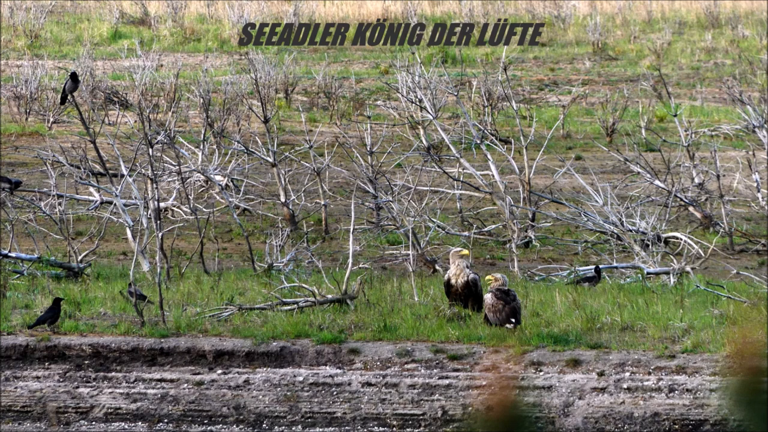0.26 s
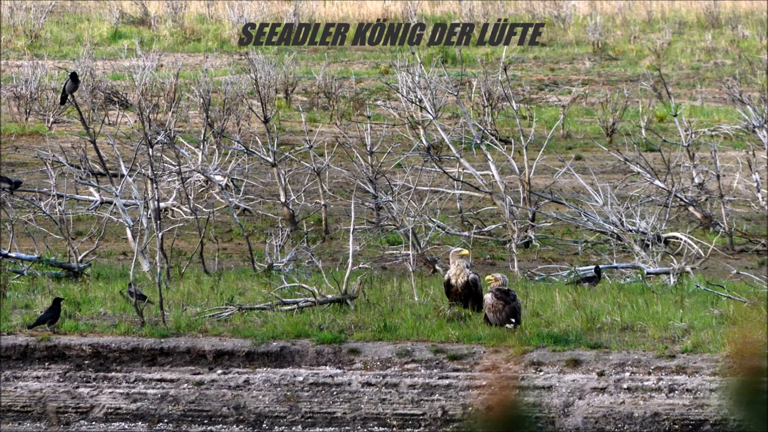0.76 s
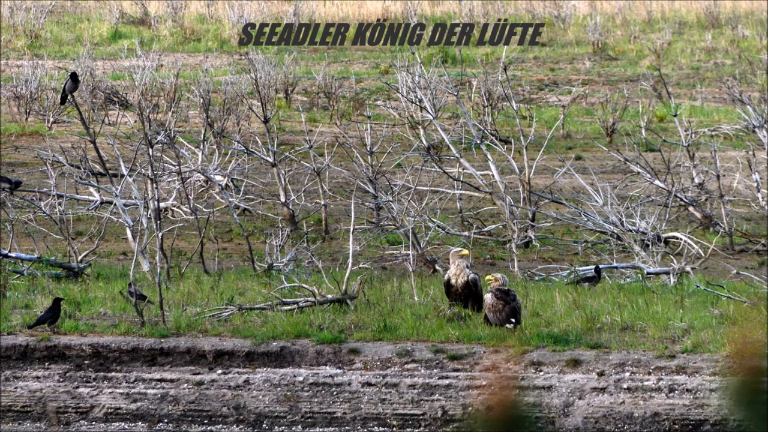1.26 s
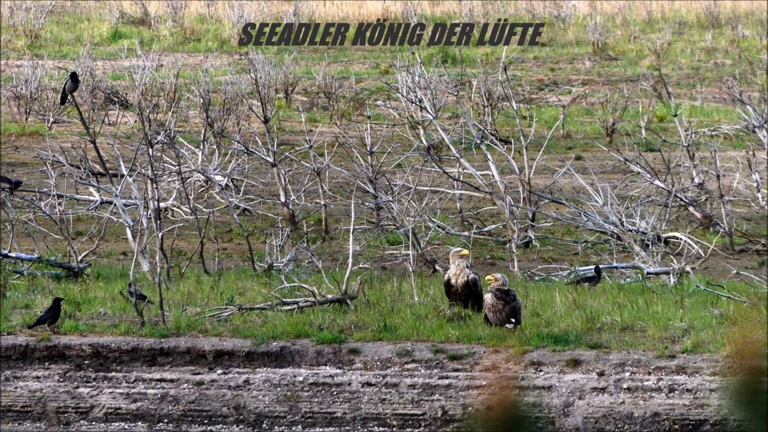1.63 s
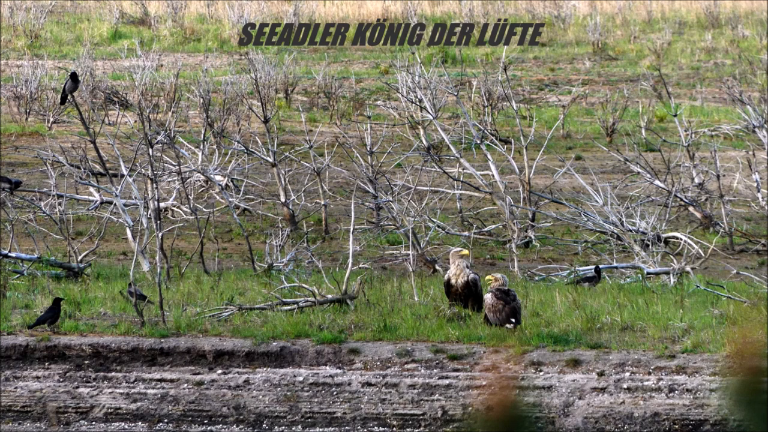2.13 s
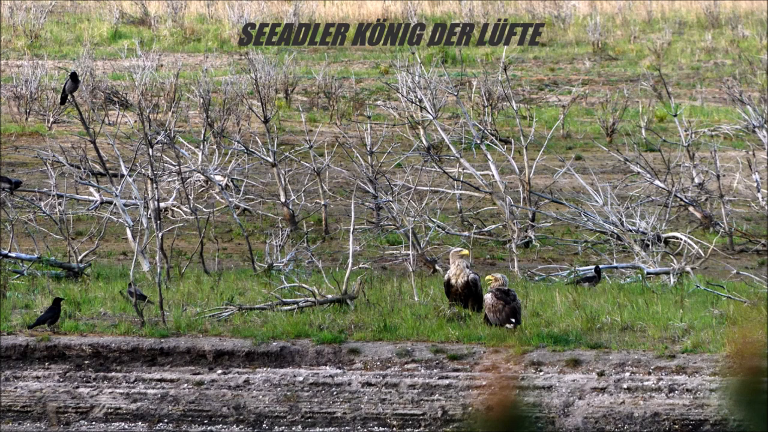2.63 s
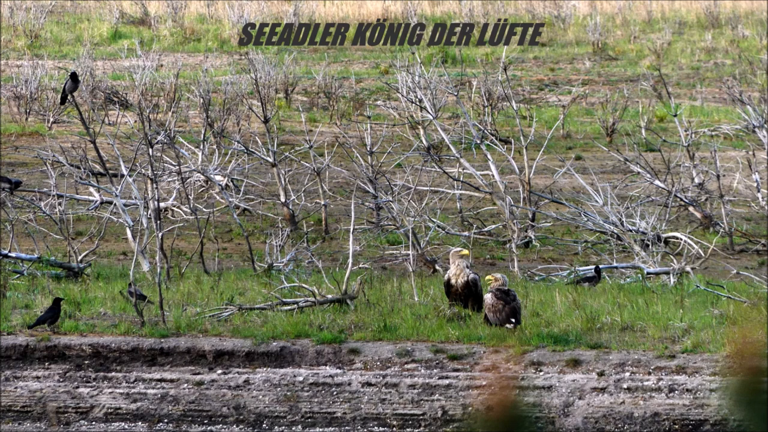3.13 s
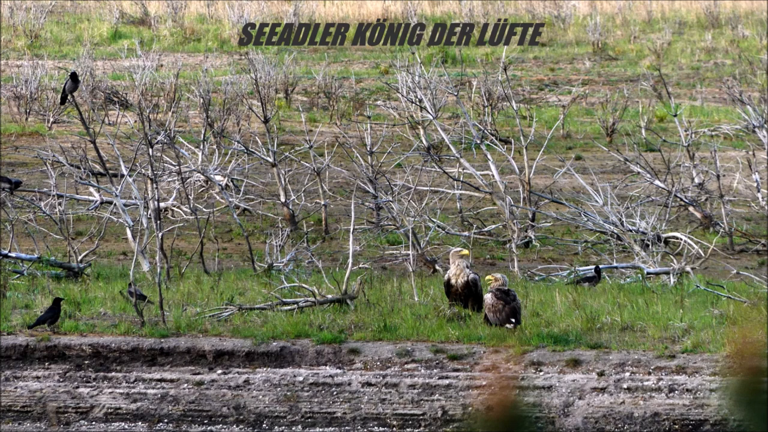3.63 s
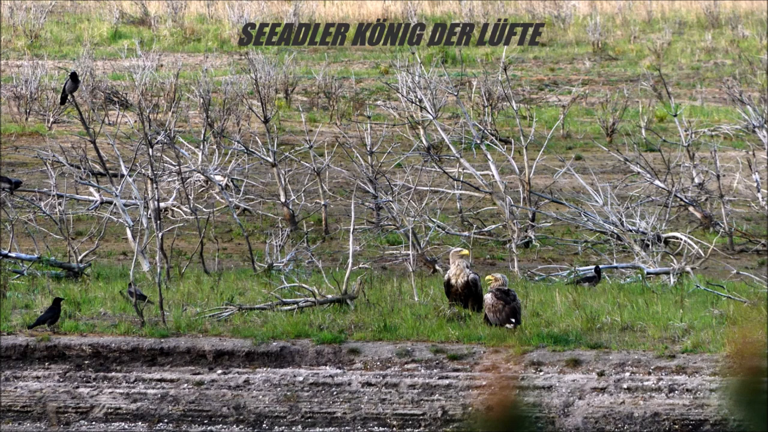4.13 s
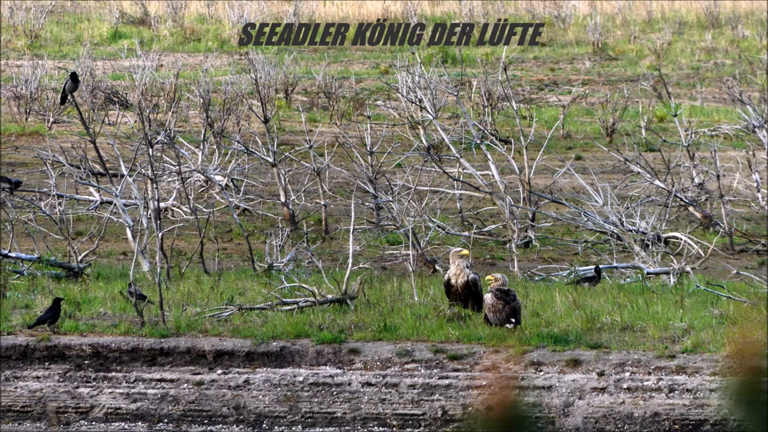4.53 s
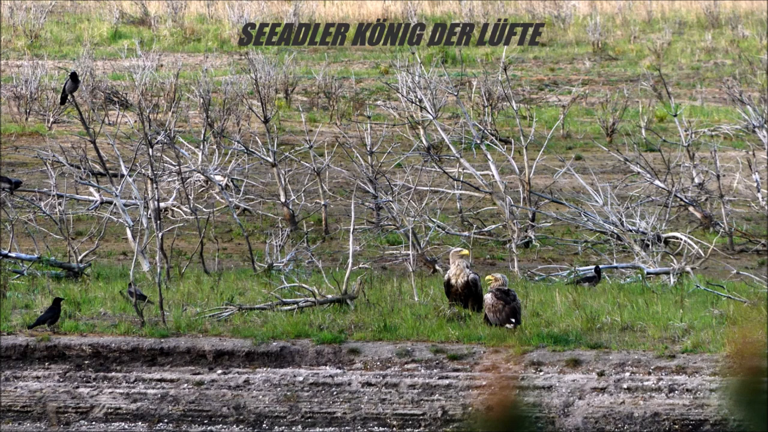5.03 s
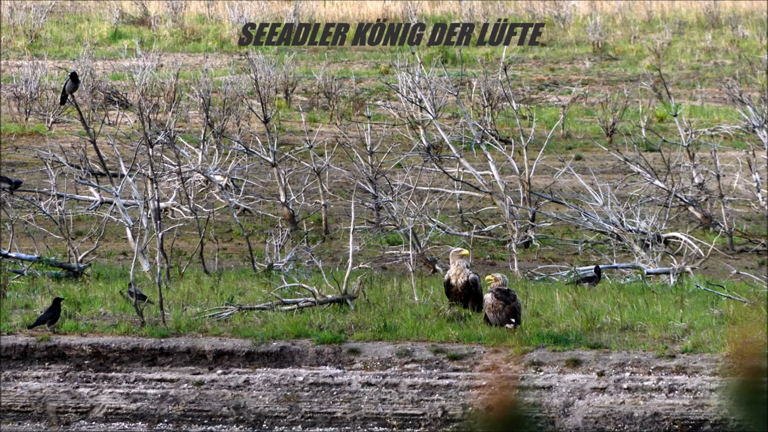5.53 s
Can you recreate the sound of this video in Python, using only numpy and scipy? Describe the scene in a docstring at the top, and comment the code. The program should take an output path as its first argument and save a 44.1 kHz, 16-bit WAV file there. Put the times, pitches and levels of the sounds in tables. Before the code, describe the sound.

Two large eagles call outdoors among dead trees, at a distance from the microphone. One gives loud, hoarse, breaking yelps that thin into short spaced ones; from about three seconds another repeats rounded yelps around five per second, slowly fading. Each leaves a wavering echo. Faint wind hiss and small high bird-like chirps lie beneath. Near the end a click chops the sound and a fresh yelp follows.

```python
"""Eagles over a marsh

Two large eagles yelp in bouts across a marsh of dead trees, far from a microphone.
Each note is a short stack of gliding overtones; trunks and banks scatter it back as a wavering noise tail.
Narrow noise makes faint high patches, an insect line and a murmur; noise bands make a faint wind.
Near the end a splice chops the sound with a click and fades the next piece in."""
import sys
import numpy as np
from scipy import signal
from scipy.fft import rfft, irfft, next_fast_len
from scipy.io import wavfile
from scipy.ndimage import uniform_filter1d

SR = 44100
rng = np.random.default_rng(int(sys.argv[2]) if len(sys.argv) > 2 else 0)


def waveform_to_disk(signal):
    """Save audio, clipped to [-1, 1], as 16-bit WAV at the path in sys.argv[1]."""
    frames = np.transpose(np.atleast_2d(signal))
    scaled = np.clip(frames, -1, 1) * 32767
    samples = np.round(scaled).astype(np.int16)
    wavfile.write(sys.argv[1], SR, samples)


N = 254456
TIME_S = np.arange(N) / SR
SPLICE_S, SPLICE_FADE_S = 5.6488, 0.004


def undb(db):
    """dB to gain."""
    return 10 ** (np.asarray(db) / 20)


def walk(steps_per_s, size):
    """Smooth random walk with spread near 1."""
    hold = max(int(SR / steps_per_s), 1)
    steps = np.repeat(rng.standard_normal(size // hold + 1), hold)
    return 1.42 * uniform_filter1d(uniform_filter1d(steps, hold), hold)[:size]


def curve(rows):
    """Rows (time_s, value) as one value a sample."""
    return np.interp(TIME_S, *np.transpose(rows))


def add(out, start_s, sound):
    """Mix a sound in at start_s."""
    i = int(start_s * SR)
    out[i:i + len(sound)] += sound[:len(out) - i]


def smear(hz, width_hz):
    """Narrow noise around a moving centre: random walks on a sine and a cosine."""
    phase = 2 * np.pi * np.cumsum(hz) / SR
    return walk(width_hz, len(hz)) * np.sin(phase) + walk(width_hz, len(hz)) * np.cos(phase)


def bursts(rows, throb_db, taper):
    """Patches of throbbing noise around a gliding centre."""
    out = np.zeros(N)
    for start_s, length_s, start_hz, end_hz, width_hz, level_db in rows:
        size = int(length_s * SR)
        patch = smear(np.linspace(start_hz, end_hz, size), width_hz)
        patch *= undb(level_db + throb_db * walk(33, size))
        add(out, start_s, patch * signal.windows.tukey(size, taper))
    return out


# echo of calls made before the start: centre_hz, width_hz, level_db
EARLIER_ECHO = [(2727, 460, -55.5), (1900, 490, -55.5), (1220, 350, -76.5), (4060, 3100, -69)]
EARLIER_T60_S = 0.99


def earlier_calls():
    """Narrow noise that still rings at the start and decays exponentially."""
    ring = sum(smear(np.full(SR, hz), width_hz) * undb(level_db) for hz, width_hz, level_db in EARLIER_ECHO)
    decay_db = -60 * np.arange(SR) / SR / EARLIER_T60_S
    return np.pad(ring * undb(decay_db), (0, N - SR))


# faint high patches, some perhaps small birds, the wide one a hissy wash:
# start_s, length_s, start_hz, end_hz, width_hz, level_db
HIGH_PATCHES = [(0.0, 0.255, 5430, 5350, 693, -61), (0.01, 0.62, 5460, 5640, 2500, -69.5),
                (0.246, 0.48, 6700, 6740, 720, -71), (.27, 0.07, 6800, 6870, 496, -61.5),
                (.4, 0.11, 6880, 6810, 117, -54.5), (.47, 0.28, 5200, 5250, 510, -59.5),
                (.62, 0.17, 4200, 4230, 397, -66.5), (.66, 0.24, 3180, 3210, 160, -58),
                (.85, 0.26, 3120, 3220, 155, -79), (2.55, 0.2, 5350, 5220, 302, -74.5),
                (5.35, 0.12, 5440, 5040, 300, -76), (5.7, 0.066, 5500, 5600, 200.5, -83)]


def faint_patches():
    """Faint patches of high throbbing noise, some perhaps small birds; the wide one a hissy wash."""
    return bursts(HIGH_PATCHES, throb_db=2.0, taper=0.33)


INSECT_HZ, INSECT_DB = 6010, -92


def insects():
    """A thin whine at one pitch, wavering in level."""
    return smear(np.full(N, INSECT_HZ), 40) * undb(INSECT_DB + 2 * walk(6.3, N))


# top treble hiss before trim: time_s, level_db
TREBLE_LEVEL = [(0.0, -79), (0.48, -63.5), (0.9, -86), (1.41, -79.5), (2.2, -86.5), (5.77, -87.5)]
TREBLE_TRIM_DB = -0.5


def treble_hiss():
    """Flickering narrow noise at the top of the treble."""
    level_db = curve(TREBLE_LEVEL) + TREBLE_TRIM_DB + 3.1 * walk(25, N)
    return smear(np.full(N, 7050.0), 500) * undb(level_db)


# low murmur under the bout, before trim: time_s, level_db
MURMUR_LEVEL = [(0.0, -100), (2.5, -93.5), (2.92, -76), (3.65, -84.5), (4.18, -79), (4.4, -88), (5.46, -83),
                (5.65, -101)]
MURMUR_TRIM_DB = -4.5


def far_murmur():
    """Low narrow noise that swells and sinks."""
    level_db = curve(MURMUR_LEVEL) + MURMUR_TRIM_DB + 1.3 * walk(7.7, N)
    return smear(np.full(N, 900.0), 250) * undb(level_db)


# spectral shape of wind and far calls, before levelling: freq_hz, density_db
AIR_SHAPE = [(18, -79), (30, -41), (198, -14.5), (387, -20.5), (614, -20.5), (755, -27.5), (996, -13.5),
             (1340, -1.5), (1730, -10), (2450, 0.5), (2940, -11.5), (4250, -32), (5870, -19), (7390, -26),
             (9610, -61), (16300, -120)]
# air level before swell and flicker: time_s, level_db
AIR_LEVEL = [(0.0, -68), (5.77, -71)]
# swell of the air's middle bands: time_s, gain_db
FAR_CALL_SWELL = [(0, -2), (1.5, -5), (2.8, 1), (3.2, 2.5), (5.6, 4), (5.77, -16)]


def air():
    """Wind and far calls: half-octave noise bands that swell together and flicker alone."""
    shape_hz, shape_db = np.transpose(AIR_SHAPE)
    size = next_fast_len(N)
    f = np.maximum(np.arange(size // 2 + 1) * SR / size, 1)
    shape = undb(np.interp(np.log(f), np.log(shape_hz), shape_db))
    swell = walk(0.84, N)
    out = 0
    for centre_hz in 30 * 2 ** np.arange(0, 8.5, 0.5):
        band = np.clip(1 - np.abs(2 * np.log2(f / centre_hz)), 0, 1) ** 0.5
        noise = irfft(rfft(rng.standard_normal(size)) * shape * band, size)[:N]
        far_db = curve(FAR_CALL_SWELL) * (900 < centre_hz < 3500)
        out = out + noise * undb(far_db + 1.1 * swell + 2.8 * walk(9.3, N))
    return out / np.sqrt(np.mean(shape ** 2)) * undb(curve(AIR_LEVEL))


def arch(t, length_s, start_hz, crest_hz, crest_s, end_hz, climb, drop):
    """Pitch that bends to a crest and on to the end; climb and drop are curvatures, 1 straight."""
    crest_s = min(crest_s, length_s - 1 / SR)
    before = np.clip(1 - t / crest_s, 0, 1)
    after = np.clip((t - crest_s) / (length_s - crest_s), 0, 1)
    return crest_hz + (start_hz - crest_hz) * before ** climb + (end_hz - crest_hz) * after ** drop


# base hoarseness, before breath and overtone scaling: time_s, noise_share
HOARSENESS = [(0, 0.15), (.7, 0.17), (1.0, 0.1), (2.8, 0.03), (3.0, 0.04), (5.77, 0)]


def note(start_s, length_s, glide, level_db, fade_db, overtones_db, throat, rasp,
         flutter_db=1.0, attack_s=0.0044, release_s=0.0028):
    """The syrinx membrane: a gliding, unsteady stack of overtones coloured by the throat."""
    size = int(length_s * SR)
    t = np.arange(size) / SR
    pitch_hz = arch(t, length_s, *glide) * (1 + 0.0054 * walk(300, size))
    phase = 2 * np.pi * np.cumsum(pitch_hz) / SR
    edge = np.clip(t / attack_s, 0, 1) ** 2 * np.clip((length_s - t) / release_s, 0, 1)
    # the membrane flaps unevenly, more so as the breath runs out and in the higher overtones
    hoarse = np.interp(start_s, *np.transpose(HOARSENESS)) + rasp * (t / length_s) ** 6
    strongest = np.argmax(overtones_db)
    stack = 0
    for k, overtone_db in enumerate(overtones_db, 1):
        away = 1.5 + 0.703 * abs(k - 1 - strongest)  # grows with steps from the strongest overtone
        throat_db = np.interp(k * pitch_hz, *np.transpose(throat)) if throat else 0
        colour_db = throat_db + away * flutter_db * walk(147, size)
        depth = hoarse * away ** 0.91
        uneven = (1 + depth * walk(500, size)) / np.sqrt(1 + depth ** 2)
        stack = stack + undb(overtone_db + colour_db) * uneven * np.sin(k * phase)
    return stack * undb(level_db + fade_db * t / length_s) * edge


# hoarse grunts, breaks and a short echo near 2700 Hz:
# start_s, length_s, start_hz, end_hz, width_hz, level_db
GRUNT_ROWS = [(.115, 0.056, 2500, 1950, 1500, -54.5), (.335, 0.051, 1560, 1715, 1327, -57.5),
              (0.75, .009, 3100, 2870, 294, -50.5), (.922, 0.02, 2700, 2660, 400, -57),
              (1.17, 0.055, 1997, 2150, 296, -57.5), (1.43, 0.024, 2020, 1935, 900, -59),
              (2.041, 0.014, 2400, 2500, 912, -52.5), (3.11, .02, 4500, 4420, 600, -62)]


def grunts():
    """Hoarse grunts, breaks and a short echo near 2700 Hz, as throbbing noise around the notes."""
    return bursts(GRUNT_ROWS, throb_db=4.5, taper=0.4)


# level whistles: start_s, length_s, start_hz, held_hz, end_hz, level_db, fade_db (over the note),
# second_db, third_db (overtones against the first)
WHISTLE_ROWS = [(0.118, 0.018, 1254, 1243, 1290, -50, 3, -12.5, -38),
                (0.43, 0.044, 1933, 1808, 1810, -34.5, -14.5, -21, -18),
                (0.66, 0.027, 2127, 1863, 1760, -33, -6.5, -15, -24.5),
                (0.869, 0.049, 1652, 1723, 1820, -35, -1.5, -19, -21),
                (1.002, 0.039, 1140, 1087, 1100, -64, -7.5, -10, -19),
                (1.119, 0.047, 1554, 1742, 1786, -39.5, -4, -10, -18),
                (1.163, 0.012, 2180, 2130, 1910, -32.5, -9.5, -17, -43),
                (1.39, 0.037, 1770, 1792, 1640, -38.5, -6.5, -18, -23.5),
                (1.42, 0.014, 2090, 2043, 2000, -41.5, -2, -29.5, -46),
                (1.685, 0.051, 1810, 1774, 1670, -39.5, -9, -11.5, -20.5),
                (2.041, 0.098, 1627, 1782, 1701, -38.5, -4.5, -15.5, -24),
                (2.343, 0.045, 1850, 1736, 1730, -39, -4.5, -15.5, -24.5),
                (2.654, 0.063, 1787, 1744, 1730, -40.5, -0.5, -18.5, -38.5),
                (2.934, 0.051, 1820, 1777, 1610, -43, -12, -17.5, -44.5),
                (2.999, 0.011, 1357, 1306, 1230, -43, -2.5, -3.5, -44),
                (3.202, 0.055, 1924, 1870, 1820, -48.5, -3, -19, -37),
                (3.47, 0.029, 1930, 1830, 1745, -48.5, -4, -18, -25),
                (3.719, 0.035, 1890, 1830, 1665, -48.5, -4, -18, -29.5),
                (5.458, 0.045, 1625, 1758, 1777, -52, 3.5, -19, -28),
                (5.666, 0.088, 1697, 1815, 1734, -45, -6.5, -20.5, -38)]
WHISTLE_FOURTH_DB = -30  # against the first overtone
WHISTLE_SETTLE = 0.4  # share of the note before the held pitch


def whistles():
    """Notes with the first overtone strongest and no throat colour."""
    out = np.zeros(N)
    for (start_s, length_s, start_hz, held_hz, end_hz,
         level_db, fade_db, second_db, third_db) in WHISTLE_ROWS:
        glide = (start_hz, held_hz, WHISTLE_SETTLE * length_s, end_hz, 1.8, 1.8)
        overtones_db = (0, second_db, third_db, WHISTLE_FOURTH_DB)
        add(out, start_s, note(start_s, length_s, glide, level_db, fade_db, overtones_db, None,
                               rasp=0.2, release_s=0.0079, flutter_db=1.07))
    return out


# nearer eagle, plus two faint lower notes, perhaps from another far bird:
# start_s, length_s, start_hz, crest_hz, crest_s (into the note), end_hz, level_db,
# fade_db (over the note), first_db, third_db (overtones against the second)
NEAR_ROWS = [(0.137, 0.059, 1186, 1424, .021, 810, -27, -13.5, -20, -15.5),
             (0.377, 0.054, 1178, 1399, .021, 980, -28, -7, -27.5, -19),
             (0.625, 0.041, 1180, 1432, 0.022, 1351, -29, -2.5, -23, -25.5),
             (0.792, 0.058, 1000, 1113, 0.019, 1134, -55.5, -2, 0.5, -17),
             (1.373, 0.02, 1193, 1360, 0.022, 1370, -39, 3.5, -22.5, -50),
             (1.665, 0.026, 1175, 1368, 0.022, 1375, -43.5, 6, -10.5, -24.5),
             (2.039, 0.022, 1355, 1467, 0.017, 1440, -35, -11, -24, -43),
             (2.324, 0.022, 1190, 1373, 0.018, 1370, -39.5, 5, -14.5, -24.5),
             (2.63, 0.029, 1156, 1365, 0.025, 1340, -42.5, 4, -16, -21.5),
             (2.748, 0.049, 1014, 1021, 0.019, 911, -55, -3.5, -4, 3.5),
             (3.179, 0.027, 1287, 1437, .022, 1430, -42, -0.5, -14, -25),
             (3.43, 0.036, 1245, 1416, .03, 1400, -44, -0.5, -9, -26.5),
             (3.957, 0.099, 1240, 1453, 0.044, 1350, -44.5, -1, -10, -30.5),
             (4.296, 0.033, 1380, 1460, 0.016, 1320, -46, -3.5, -7, -23.5),
             (5.6425, 0.028, 1200, 1288, 0.012, 1290, -45, -1, -23, -33),
             (5.652, 0.019, 1253, 1410, 0.019, 1390, -46, 3, -17, -46)]
# open-beak resonances: freq_hz, gain_db
NEAR_THROAT = [(1000, -19), (1250, -2), (1390, 0), (2000, 7.5), (2900, 1), (3600, -26), (4250, 5),
               (4800, 5.5), (5200, -9.5), (5700, -4), (7000, -0.5)]
NEAR_FOURTH_DB = -11  # against the third overtone
NEAR_CLIMB, NEAR_DROP = 1.15, 1.9


def near_eagle():
    """Open-beak yelps, plus two faint lower notes, perhaps another far bird; the splice cuts one yelp."""
    out = np.zeros(N)
    for (start_s, length_s, start_hz, crest_hz, crest_s, end_hz,
         level_db, fade_db, first_db, third_db) in NEAR_ROWS:
        glide = (start_hz, crest_hz, crest_s, end_hz, NEAR_CLIMB, NEAR_DROP)
        overtones_db = (first_db, 0, third_db, third_db + NEAR_FOURTH_DB)
        call = note(start_s, length_s, glide, level_db, fade_db, overtones_db, NEAR_THROAT,
                    rasp=0.45, attack_s=0.0061)
        if start_s < SPLICE_S:
            call = call[:int((SPLICE_S - start_s) * SR) + 2]
        add(out, start_s, call)
    return out


# farther eagle: start_s, length_s, crest_hz, crest_s (into the note), end_hz, level_db,
# fade_db (over the note), first_db (overtone against the second)
BOUT_ROWS = [(2.898, 0.05, 1373, 0.021, 1112, -32, 0.5, -9.5),
             (3.071, 0.044, 1422, 0.024, 1115, -31, -4.5, -10.5),
             (3.253, 0.055, 1415, 0.019, 1140, -33, -3.5, -7.5),
             (3.452, .058, 1417, 0.02, 1048, -33.5, -7.5, -7),
             (3.651, 0.059, 1430, .021, 1003, -34.5, -5, -9),
             (3.85, 0.059, 1428, 0.023, 1010, -37.5, -2.5, -8.5),
             (4.05, 0.06, 1428, 0.021, 1063, -38, -0.5, -8),
             (4.254, .064, 1435, .02, 1072, -35.5, -5, -9.5),
             (4.45, 0.059, 1443, 0.022, 1034, -38, -3, -6.5), (4.648, .066, 1445, .023, 1035, -38, -2, -6),
             (4.85, .064, 1451, .021, 1058, -39, -2, -5.5),
             (5.048, 0.065, 1465, 0.025, 1035, -39.5, -0.5, -7),
             (5.247, 0.067, 1463, 0.022, 1057, -37.5, -3, -8),
             (5.443, 0.07, 1445, 0.025, 1023, -38.5, -1.5, -7.5)]
# throat resonances: freq_hz, gain_db
FAR_THROAT = [(1100, -16), (1300, -8), (1420, 1), (2000, -3), (2900, 0), (3600, -26), (4000, -16.5),
              (4300, 4.5), (4700, -9), (5400, -11.5), (5800, 0.5)]
BOUT_RISE_HZ, BOUT_CLIMB, BOUT_DROP = 227.5, 2.1, 3.2
BOUT_THIRD_DB, BOUT_FOURTH_DB = -28.5, -29.5  # against the second overtone


def far_bout():
    """A steady bout of rounded yelps, each climbing by the same interval in Hz."""
    out = np.zeros(N)
    for start_s, length_s, crest_hz, crest_s, end_hz, level_db, fade_db, first_db in BOUT_ROWS:
        glide = (crest_hz - BOUT_RISE_HZ, crest_hz, crest_s, end_hz, BOUT_CLIMB, BOUT_DROP)
        overtones_db = (first_db, 0, BOUT_THIRD_DB, BOUT_FOURTH_DB)
        add(out, start_s, note(start_s, length_s, glide, level_db, fade_db, overtones_db, FAR_THROAT,
                               rasp=0.35))
    return out


# the voice catches: time_s, dip_db
VOICE_CATCHES = [(0.159, -7), (0.172, -11.5), (.398, -4.5), (0.417, -4), (0.65, -9), (4.292, -8.5)]
CATCH_WIDTH_S = 0.0016


def calls_dry():
    """All calls, dry, with brief catches; the beak radiates no bass."""
    out = grunts() + whistles() + near_eagle() + far_bout()
    catch_db = sum(dip_db * np.exp(-((TIME_S - s) / CATCH_WIDTH_S) ** 2) for s, dip_db in VOICE_CATCHES)
    return signal.sosfilt(signal.butter(4, 950, "high", fs=SR, output="sos"), out * undb(catch_db))


# send into the scatter: time_s, share_db
SCATTER_SEND = [(0, -24.5), (.8, -27), (2.8, -29.5), (2.95, -20.5), (4.2, -18), (5.6, -19), (5.66, -23.5)]
# decay energy before the rise and filter: t60_s, energy_db
SCATTER_TAILS = [(.2, 17), (1.201, 5.5)]
# echo clumps off banks, relative strength: delay_s, strength_db
BANK_ECHOES = [(.04, -5), (.09, -4), (0.16, -13.5)]
SCATTER_RISE_S = 0.018
TURN_PERIOD_S = 0.8  # period over which the echo patterns take turns


def marsh(dry, count=4):
    """Many trunks give a noisy decay, a few banks denser clumps of echoes; several patterns take turns."""
    t = np.arange(int(1.5 * SR)) / SR
    power = sum(undb(db) ** 2 / t60_s * 1e-6 ** (t / t60_s) for t60_s, db in SCATTER_TAILS) * np.log(1e6)
    power += sum(undb(db) ** 2 * np.exp(-((t - s) / 0.031) ** 2) / 0.013 for s, db in BANK_ECHOES)
    rise = np.clip(t / SCATTER_RISE_S, 0, 1)
    send = dry * undb(curve(SCATTER_SEND))
    out = 0
    for k in range(count):
        response = np.sqrt(power / SR) * rng.standard_normal(len(t)) * rise
        response *= undb(2.5 * walk(80, len(t)))  # trunks stand in clumps
        response = signal.lfilter([0.6], [1, -0.4], response)  # air and leaves dull the treble
        turn = np.clip(np.cos(2 * np.pi * (TIME_S / TURN_PERIOD_S - k / count)), 0, 1)
        out = out + signal.fftconvolve(send * turn, response)[:N]
    return out


def scene():
    """Calls, echoes and background; echoes from before the splice do not carry over it."""
    calls = calls_dry()
    before = TIME_S < SPLICE_S
    tail = np.where(before, marsh(calls * before), marsh(calls * ~before))
    background = faint_patches() + insects() + treble_hiss() + far_murmur() + air()
    return (calls + tail + earlier_calls() + background)[None]


MIC_TOP_HZ, TOP_HZ = 7350, 15800
HISS_DB = -98.5  # recorder noise before the last filter
POP_DB, POP_RISE_S = -47, 0.00014  # before the last filter


def record(dry):
    """A narrow-band microphone; the splice chops the sound, pops and fades the next piece in."""
    x = signal.sosfilt(signal.ellip(10, 0.2, 70, MIC_TOP_HZ, fs=SR, output="sos"), dry)
    after_s = TIME_S - SPLICE_S
    fade_out = np.clip(-after_s / 0.00005, 0, 1)
    fade_in = np.clip(after_s / SPLICE_FADE_S, 0, 1)
    x = x * np.where(after_s < 0, fade_out, fade_in)
    pop = undb(POP_DB) * np.exp(np.minimum(after_s, 0) / POP_RISE_S) * (after_s < 0)
    x = x + pop + undb(HISS_DB) * rng.standard_normal(N)
    return signal.sosfilt(signal.ellip(4, 0.2, 10, TOP_HZ, fs=SR, output="sos"), x)


dry = scene()
out = record(dry)
waveform_to_disk(out)
```